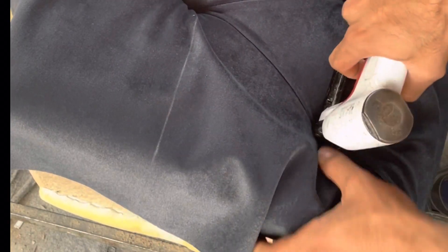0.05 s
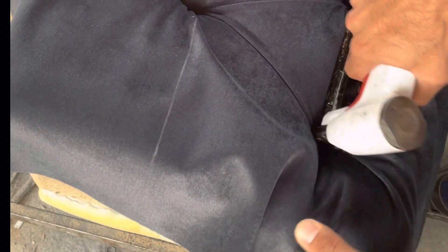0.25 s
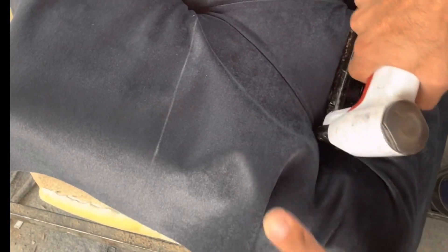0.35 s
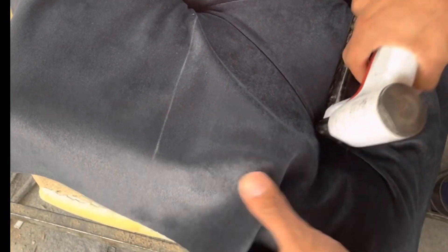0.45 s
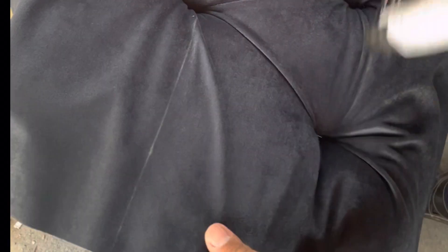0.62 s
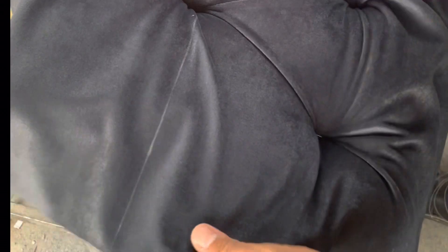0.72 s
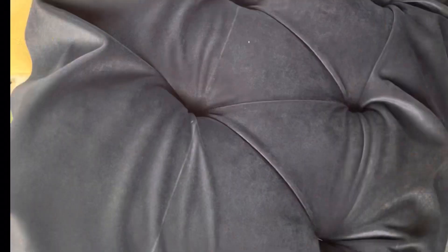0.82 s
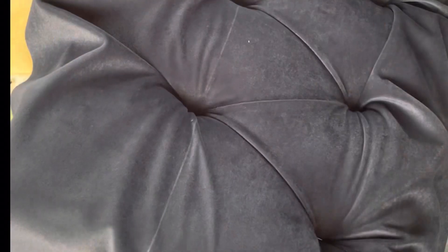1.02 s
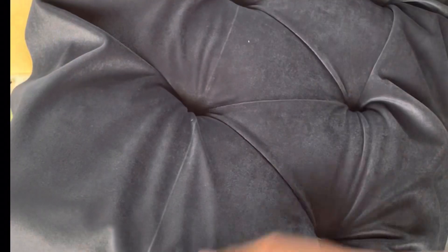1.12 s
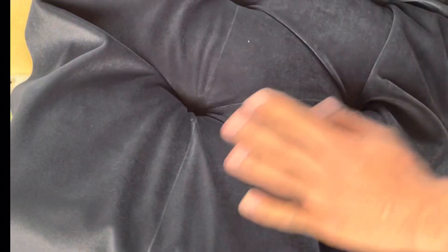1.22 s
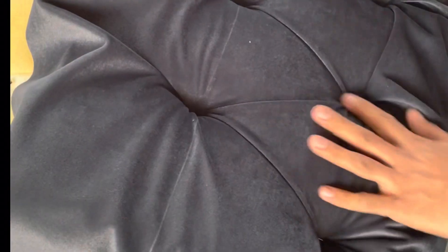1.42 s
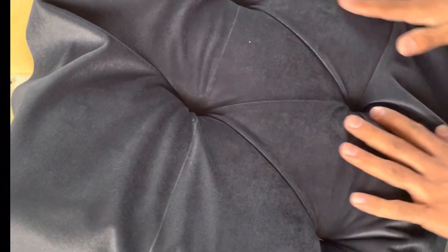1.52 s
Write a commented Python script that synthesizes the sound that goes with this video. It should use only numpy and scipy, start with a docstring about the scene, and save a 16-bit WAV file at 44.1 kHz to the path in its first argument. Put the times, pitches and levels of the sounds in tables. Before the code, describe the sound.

One sharp pneumatic stapler shot and hissing release, followed by faint fabric rubbing.

```python
"""An air stapler drives one staple through upholstery into a wooden frame, close by, in a quiet workshop.
Over a low rumble a hand brushes the fabric; air rushes in, the piston slams home and the frame knocks.
The gain control ducks the rumble; on release the air vents and piston and trigger snap back.
Later the hand smooths the fabric, makes one small tick and pats the cushion."""
import sys
import numpy as np
from scipy import signal
from scipy.fft import rfft, irfft, next_fast_len
from scipy.io import wavfile
from scipy.ndimage import uniform_filter1d, minimum_filter1d

SR = 44100
rng = np.random.default_rng(int(sys.argv[2]) if len(sys.argv) > 2 else 0)


def put_to_file(sound):
    """Save the sound as 16-bit audio at rate SR, in the file named by the first command-line argument."""
    columns = np.atleast_2d(sound).T  # one column per channel
    safe = np.clip(columns, -1, 1)
    whole_steps = np.round(safe * 32767)
    wavfile.write(sys.argv[1], SR, whole_steps.astype(np.int16))


N = 68355
TIME_S = np.arange(N) / SR
FFT_SIZE = 2 * next_fast_len(N, real=True)
BIN_HZ = np.maximum(np.arange(FFT_SIZE // 2 + 1) * SR / FFT_SIZE, 1)


def from_db(db):
    """Decibels to gain."""
    return 10 ** (np.asarray(db) / 20)


def curve(table, column=1):
    """A table column interpolated onto BIN_HZ in log frequency."""
    rows = np.array(table)
    return np.interp(np.log(BIN_HZ), np.log(rows[:, 0]), rows[:, column])


def filtered(x, response):
    """Apply a frequency response given on BIN_HZ."""
    return irfft(rfft(x, FFT_SIZE) * response, FFT_SIZE)[..., :N]


def noise(spectrum, tilt_db_per_oct=0):
    """Coloured noise of rms 1."""
    gain = from_db(curve(spectrum) + tilt_db_per_oct * np.log2(BIN_HZ))
    return filtered(rng.standard_normal(N), gain / np.sqrt(np.mean(gain ** 2)))


def envelope(start_s, rise_s, hold_s, t60_s):
    """Linear rise, hold, exponential decay."""
    age_s = TIME_S - start_s
    rise = np.clip(age_s / max(rise_s, 1 / SR), 0, 1)
    return rise * from_db(-60 * np.maximum(age_s - rise_s - hold_s, 0) / t60_s)


def burst(spectrum, start_s, rise_s, hold_s, t60_s, level_db, tilt_db_per_oct):
    """Enveloped noise."""
    return from_db(level_db) * envelope(start_s, rise_s, hold_s, t60_s) * noise(spectrum, tilt_db_per_oct)


def ring(start_s, pitch_hz, level_db, rise_s, t60_s):
    """One decaying mode."""
    tone = np.sin(2 * np.pi * pitch_hz * (TIME_S - start_s))
    return from_db(level_db) * envelope(start_s, rise_s, 0, t60_s) * tone


def struck(modes, start_s, level_db):
    """All modes of a metal part excited at once, in alternating polarity."""
    return sum((-1) ** k * ring(start_s, pitch_hz, level_db + relative_db, 0, t60_s)
               for k, (pitch_hz, relative_db, t60_s) in enumerate(modes))


# Diffuse field width: freq_hz, side_minus_mid_db
WIDTH = [(60, -47), (150, -26), (380, -9.5), (950, 0), (2400, -6.5), (6000, -3), (8500, 5), (10300, 38),
         (12500, -8), (15000, 8)]


def diffuse(mid, side):
    """Two unrelated signals form a stereo field, near mono in the bass."""
    width = from_db(curve(WIDTH))
    norm = np.hypot(1, width)
    return filtered(mid, 1 / norm) + filtered(side, width / norm) * [[1], [-1]]


# Workshop noise: freq_hz, relative_db
RUMBLE_SPECTRUM = [(20, -10), (45, -2.5), (80, 3.5), (115, -0.5), (180, -5.5), (280, -10.5), (365, -8),
                   (500, -13), (850, -13), (1500, -23.5), (3000, -27.5), (5500, -33), (8500, -38),
                   (15000, -48.5)]
# Motor tones: pitch_hz, rms_db
MOTOR_TONES = [(48, -57.5), (109, -55.5), (355, -58)]


def background(rumble_db=-43.5):
    """Low rumble, faint hiss and the hum of a distant motor."""
    hum = sum(np.sqrt(2) * from_db(rms_db) * np.sin(2 * np.pi * (pitch_hz * TIME_S + rng.random()))
              for pitch_hz, rms_db in MOTOR_TONES)
    return from_db(rumble_db) * diffuse(noise(RUMBLE_SPECTRUM), noise(RUMBLE_SPECTRUM)) + hum


# Cloth friction: freq_hz, relative_db
CLOTH_SPECTRUM = [(200, -9), (900, 12.5), (1800, 3.5), (3000, 3.5), (6000, 1), (9000, -5.5), (15000, -15)]
# Hand strokes: start_s, rise_s, hold_s, t60_s, level_db, tilt_db_per_oct
STROKES = [(0.193, 0.012, 0.012, 0.052, -52, -2), (0.692, 0.23, 0.59, 0.55, -64, 6),
           (1.211, 0.011, 0.039, .08, -52, -2.5), (1.266, 0.0066, 0.0069, 0.26, -49.5, 2.5),
           (1.491, 0.0086, 0.033, 0.19, -54.5, 1.5)]


def hand_strokes(roughness_db=2):
    """A hand rubs the fabric: soft noise with a grainy level."""
    grain = uniform_filter1d(rng.standard_normal(N), size=60)
    rubbing = sum(burst(CLOTH_SPECTRUM, *stroke) for stroke in STROKES)
    return rubbing * from_db(roughness_db * grain / grain.std())


# Hard contact: freq_hz, relative_db
CRACK_SPECTRUM = [(300, -6.5), (1150, -8.5), (1850, 7.5), (2800, 3), (4000, -5), (6500, 2.5), (9000, 3.5),
                  (12000, -7), (16000, -24)]
# Gun body modes: pitch_hz, relative_db, t60_s
GUN_MODES = [(1090, -2, 0.073), (1250, -4, 0.04), (1585, 5, 0.057), (1676, 3, 0.053), (1870, -2.5, 0.026),
             (1952, 1.5, 0.035), (2200, -3, 0.04), (2546, 1, 0.033), (2650, -2, .038), (3194, -1, 0.025),
             (3363, -10, 0.03), (4290, -6, .031), (4535, -8.5, 0.051), (6250, -15, 0.0287)]
# Contacts inside the gun: start_s, ring_db, crack_db, tilt_db_per_oct
METAL_HITS = [(0.2103, -52, -41.5, -3), (0.2350, -11.5, -7.5, -1), (.2390, -36, -2, -1),
              (0.3639, -30, -15.5, -3.5), (0.3713, -29, -21, -2), (0.3840, -35, -14.5, -0.5),
              (0.3893, -40, -23, 0.5), (.4625, -51, -38, .5)]


def metal_hits(hold_s=0.0015, t60_s=0.011):
    """Each contact of driver or piston cracks and rings the gun body."""
    hits = np.zeros(N)
    for start_s, ring_db, crack_db, tilt_db_per_oct in METAL_HITS:
        hits += burst(CRACK_SPECTRUM, start_s, 0, hold_s, t60_s, crack_db, tilt_db_per_oct)
        hits += struck(GUN_MODES, start_s, ring_db)
    return hits


# Air jet: freq_hz, relative_db
JET_SPECTRUM = [(80, 1.5), (200, 13), (650, 6), (1050, -12), (2000, 3.5), (3500, -1), (6000, 1), (8000, 3),
                (10500, 1), (12300, 2), (15500, -3.5)]
# Air through the valve: start_s, rise_s, hold_s, t60_s, level_db, tilt_db_per_oct
AIR_JETS = [(0.2277, 0.003, 0.0028, 0.023, -3.5, 0.9), (0.356, .002, 0.0029, .03, -18.5, 1),
            (0.364, 0.0014, 0.0077, 0.093, -16, 2), (0.387, 0.0037, 0.0033, 0.031, -27, -2)]


def air_valve():
    """The valve whistles as it opens; compressed air spits in at the shot and vents on release."""
    whistle = ring(start_s=0.217, pitch_hz=5150, level_db=-30, rise_s=0.011, t60_s=0.015)
    return whistle + sum(burst(JET_SPECTRUM, *jet) for jet in AIR_JETS)


# Wooden frame modes: pitch_hz, level_db, rise_s, t60_s
FRAME_MODES = [(275, -7, 0.0046, 0.046), (474, -14, 0.0115, 0.052), (738.6, -10, 0.01, 0.048)]


def frame_knock(start_s=0.2312):
    """The staple enters the frame, whose modes build up and die."""
    return sum(ring(start_s, *mode) for mode in FRAME_MODES)


# Padding noise: freq_hz, relative_db
PUFF_SPECTRUM = [(50, -22), (105, 4), (200, -2), (450, -3), (740, -5.5), (950, -14), (1600, -25.5),
                 (5000, -44)]
# Padding puffs: start_s, rise_s, t60_s, level_db, tilt_db_per_oct
PUFFS = [(0.2322, 0.0054, 0.057, -11.5, 3), (0.362, .003, 0.07, -15.5, -1.5),
         (.386, .003, 0.043, -24, -2.5)]


def padding_puffs():
    """The padding puffs dully under the jolting gun."""
    return sum(burst(PUFF_SPECTRUM, start_s, rise_s, 0, t60_s, level_db, tilt_db_per_oct)
               for start_s, rise_s, t60_s, level_db, tilt_db_per_oct in PUFFS)


# Staple bites, seats; piston returns; gun drops back, settles:
# start_s, start_hz, end_hz, glide_s, rise_s, t60_s, level_db
JOLTS = [(.2332, 618, 669, 0.0036, 0.0041, 0.04, 1.5), (.2392, 491, 411, .004, .0025, 0.036, 4),
         (.3620, 642, 482, 0.0026, .002, .038, -12.5), (.3652, 840, 125.4, 0.0014, .0014, 0.025, -3),
         (0.3741, 300, 95, 0.0011, 0.0016, 0.036, -15.5)]


def gun_jolts():
    """The gun thuds against the padded frame, the pitch gliding as it sinks in."""
    thuds = np.zeros(N)
    for start_s, start_hz, end_hz, glide_s, rise_s, t60_s, level_db in JOLTS:
        age_s = np.maximum(TIME_S - start_s, 0)
        pitch_hz = end_hz + (start_hz - end_hz) * np.exp(-age_s / glide_s)
        phase_rad = 2 * np.pi * np.cumsum(pitch_hz * (age_s > 0)) / SR
        thuds += from_db(level_db) * envelope(start_s, rise_s, 0, t60_s) * np.sin(phase_rad)
    return thuds


# End-stop impacts: start_s, pitch_hz, level_db, t60_s
SLAPS = [(0.235, 1870, 0.5, 0.013), (.2391, 2000, 2, .011), (0.3631, 1490, -6.5, 0.0098)]


def piston_slaps(rise_s=0.0003):
    """Driver and piston slap against their stops."""
    return sum(ring(start_s, pitch_hz, level_db, rise_s, t60_s)
               for start_s, pitch_hz, level_db, t60_s in SLAPS)


# Trigger modes: pitch_hz, relative_db, t60_s
TRIGGER_MODES = [(1873, 5, 0.03), (3170, -2.5, 0.037), (4525, 1, 0.038), (5460, 0, 0.06),
                 (6830, -3.5, 0.048), (6840, -7, 0.027), (8680, 0, 0.036), (12900, 3.5, 0.019),
                 (13900, 1, 0.022)]
# Trigger contacts: start_s, level_db
TRIGGER_CLICKS = [(.3843, -20.5), (.3888, -32.5)]


def trigger():
    """The trigger springs back and bounces once, ringing each time."""
    return sum(struck(TRIGGER_MODES, *click) for click in TRIGGER_CLICKS)


# Tick modes: pitch_hz, level_db, t60_s
TICK_MODES = [(1940, -44, 0.014), (3020, -31.5, 0.01), (4900, -57, 0.0092), (6240, -45, 0.0071)]


def tick(start_s=1.259, rise_s=0.00077):
    """One crisp tick under the hand: a snap and a short ring."""
    snap = burst(CRACK_SPECTRUM, start_s, rise_s, hold_s=0, t60_s=0.012,
                 level_db=-33.5, tilt_db_per_oct=3.5)
    return snap + sum(ring(start_s, pitch_hz, level_db, rise_s, t60_s)
                      for pitch_hz, level_db, t60_s in TICK_MODES)


# Palm on cushion: start_s, pitch_hz, level_db, rise_s, t60_s
PATS = [(1.308, 135, -36, 0.011, 0.058)]


def palm_pat():
    """The palm pats the cushion: one low, damped mode."""
    return sum(ring(*pat) for pat in PATS)


# Direct sound at the ports: freq_hz, left_lead_rad, left_minus_right_db
MIC_PORTS = [(59, -0.5, 0), (400, 0.2, -1.5), (740, 0.37, -5), (1295, -0.03, -0.5), (2530, 0.84, -.5),
             (4770, 0.66, -3.5), (8130, 1.94, 1.5), (8630, 3.5, 6), (11180, 3, -3), (12200, 5.5, 2),
             (16100, 4.5, -3)]


def mic_ports(x):
    """Two microphone ports hear near sound with different phase and level."""
    lead_rad, balance_db = curve(MIC_PORTS, column=1), curve(MIC_PORTS, column=2)
    left = from_db(balance_db / 2)
    right = from_db(-balance_db / 2) * np.exp(-1j * lead_rad)
    return filtered(x, np.array([left, right]))


# Reverb colour: freq_hz, relative_db
ROOM_SPECTRUM = [(90, -20), (220, -9.5), (410, -14.5), (620, -14), (840, -3), (1600, -15), (2200, -11.5),
                 (4000, -7), (8000, -17), (14000, -19.5)]
# Reverb decay: freq_hz, t60_s
ROOM_DECAY = [(100, 0.94), (600, 0.66), (3000, 0.53), (8000, 0.73), (15000, 0.65)]


def room_reverb(x, rise_s=0.0084, early_db=-4.5, early_t60_s=0.092):
    """Dense early reflections and a tail that lasts longest in the bass."""
    white = rng.standard_normal((2, N))
    centres_hz, t60s_s = np.array(ROOM_DECAY).T
    early = envelope(rise_s / 2, rise_s, 0, early_t60_s)
    early *= from_db(early_db) / np.linalg.norm(early)
    impulse = np.zeros((2, N))
    for t60_s, band_weights in zip(t60s_s, np.eye(len(t60s_s))):
        band = filtered(white, np.interp(np.log(BIN_HZ), np.log(centres_hz), band_weights))
        late = envelope(rise_s / 2, rise_s, 0, t60_s)
        impulse += band * (early + late / np.linalg.norm(late))
    colour = from_db(curve(ROOM_SPECTRUM)) / 2
    return filtered(x, rfft(diffuse(*impulse), FFT_SIZE) * colour)


def gain_control(x, limit_db=-9, sense_s=0.012, look_ahead_s=0.0048, hold_s=0.14, recover_db_per_s=73):
    """The gain drops just ahead of a loud sound, holds, then creeps back."""
    power = uniform_filter1d(np.mean(x ** 2, axis=0), size=int(sense_s * SR))
    cut_db = np.minimum(limit_db - 10 * np.log10(np.abs(power) + 1e-12), 0)
    hold_samples = int(hold_s * SR)
    held_db = minimum_filter1d(cut_db, size=hold_samples, origin=(hold_samples - 1) // 2)
    recovery_db = recover_db_per_s * TIME_S
    gain_db = np.minimum.accumulate(held_db - recovery_db) + recovery_db
    return x * from_db(np.interp(TIME_S + look_ahead_s, TIME_S, gain_db))


def scene():
    """Stapler and hand close by, the workshop around them."""
    stapler = air_valve() + metal_hits() + piston_slaps() + trigger()
    knocks = frame_knock() + padding_puffs() + gun_jolts()
    hand = hand_strokes() + tick() + palm_pat()
    near = stapler + knocks + hand
    return mic_ports(near) + room_reverb(near) + background()


def record(dry):
    """Gain control, soft clipping, steep low-pass."""
    ceiling, stopband_hz = 0.96, 16850
    levelled = gain_control(dry)
    rounded = levelled / (1 + (levelled / ceiling) ** 4) ** 0.25
    lowpass = signal.cheby2(18, 80, stopband_hz, fs=SR, output="sos")
    return signal.sosfilt(lowpass, rounded)


dry = scene()
out = record(dry)
put_to_file(out)
```